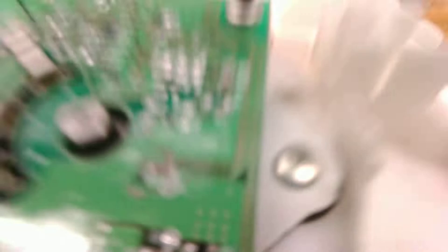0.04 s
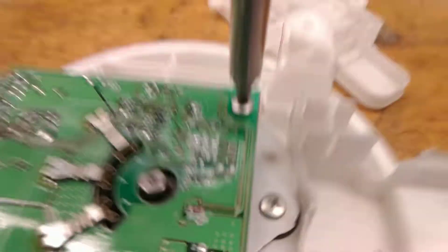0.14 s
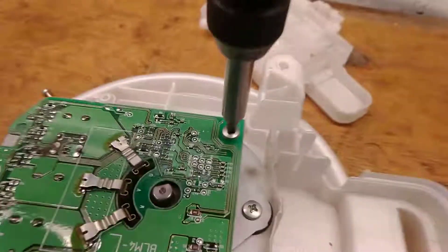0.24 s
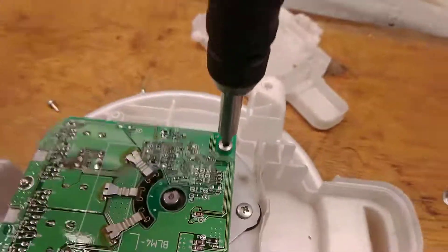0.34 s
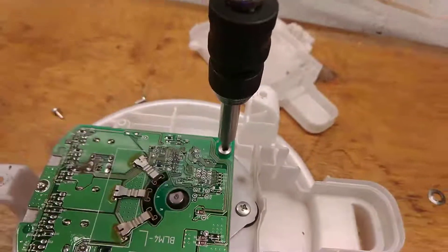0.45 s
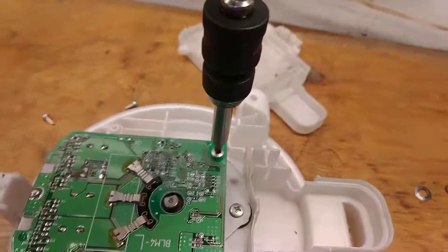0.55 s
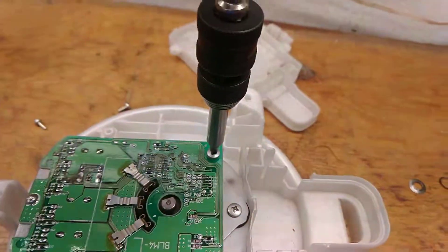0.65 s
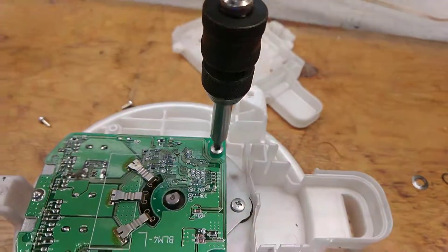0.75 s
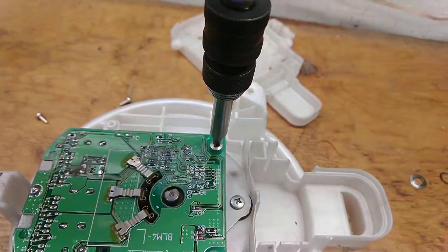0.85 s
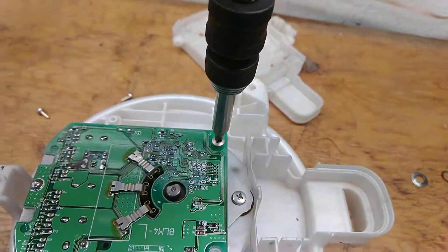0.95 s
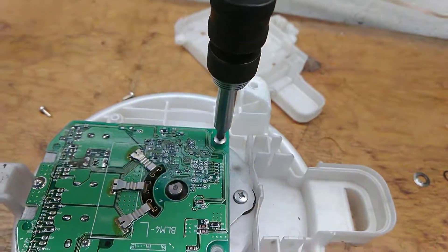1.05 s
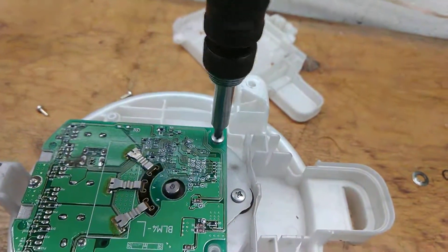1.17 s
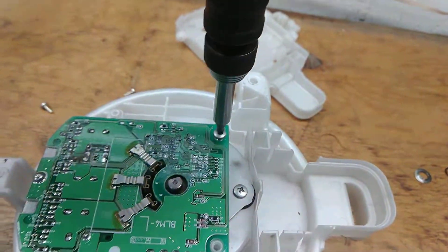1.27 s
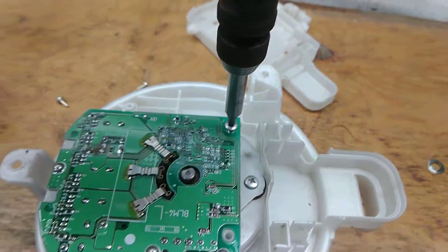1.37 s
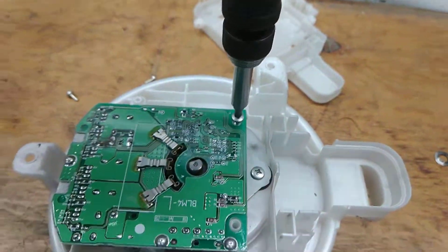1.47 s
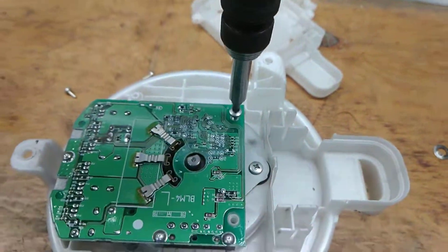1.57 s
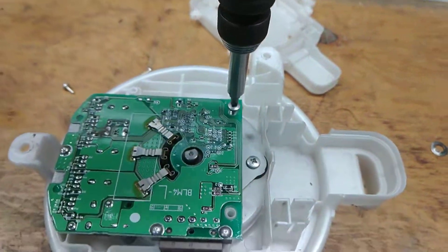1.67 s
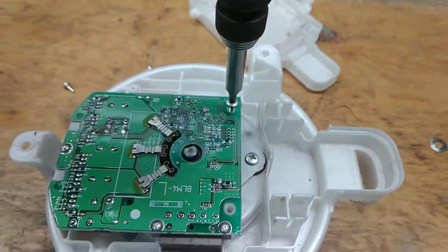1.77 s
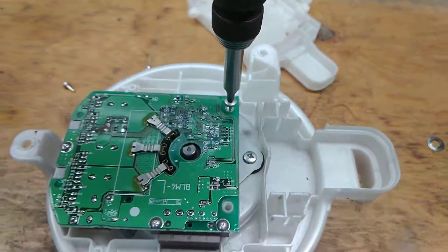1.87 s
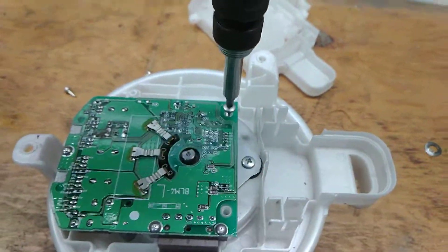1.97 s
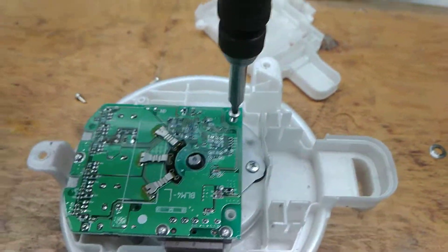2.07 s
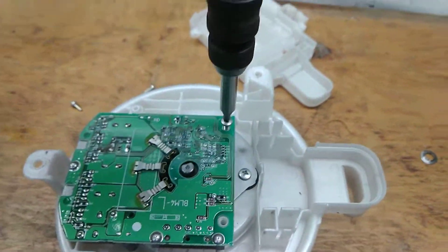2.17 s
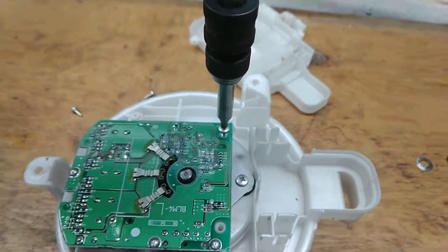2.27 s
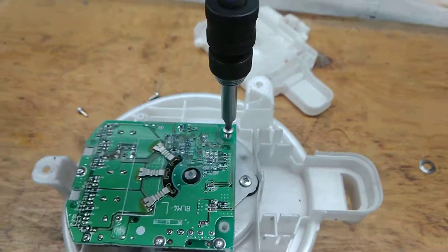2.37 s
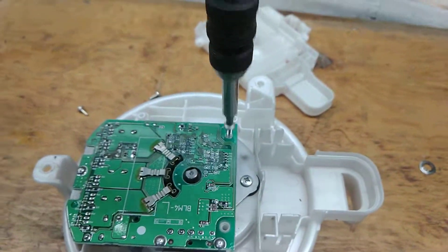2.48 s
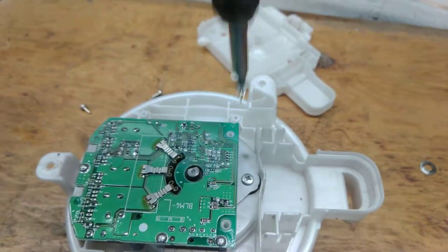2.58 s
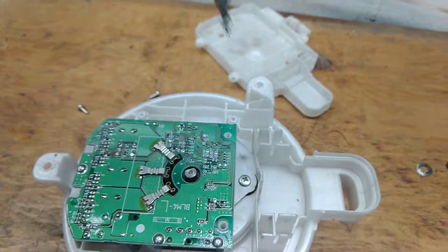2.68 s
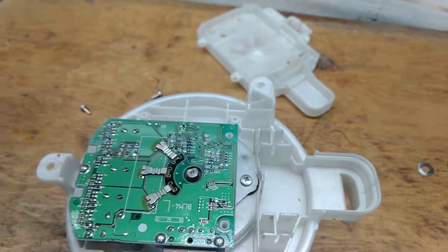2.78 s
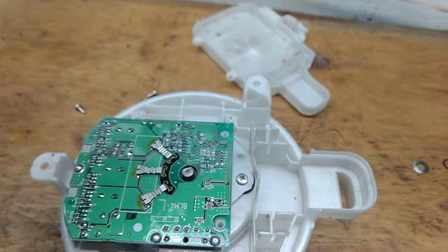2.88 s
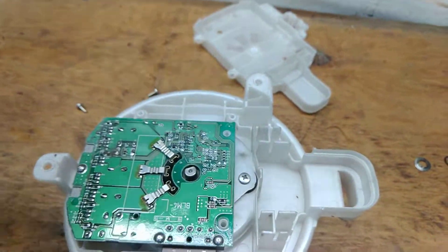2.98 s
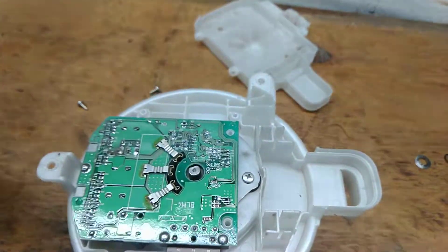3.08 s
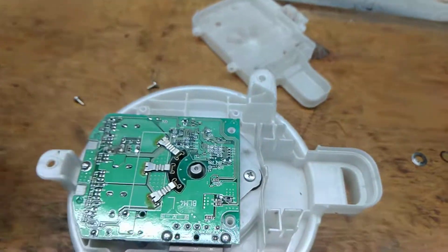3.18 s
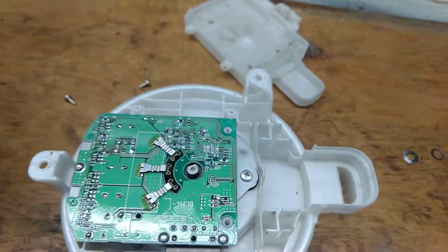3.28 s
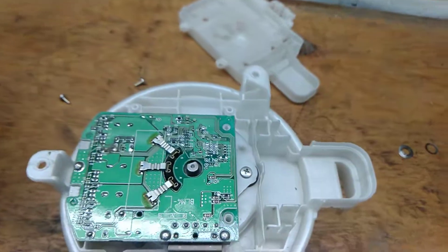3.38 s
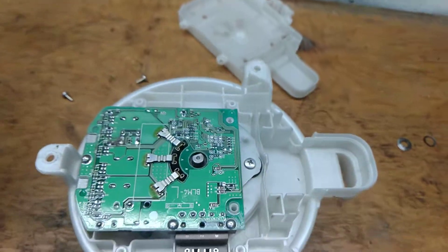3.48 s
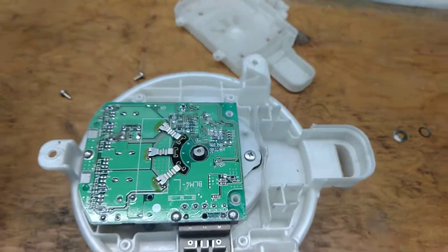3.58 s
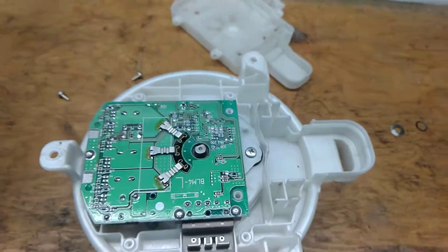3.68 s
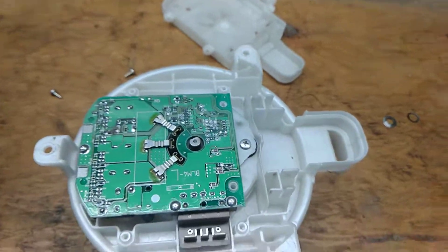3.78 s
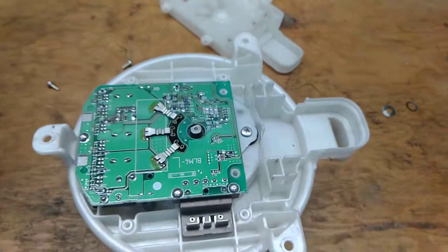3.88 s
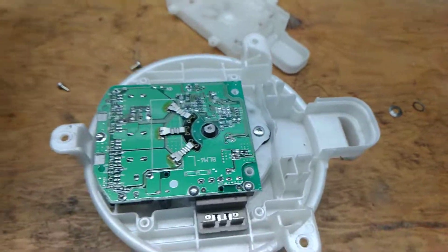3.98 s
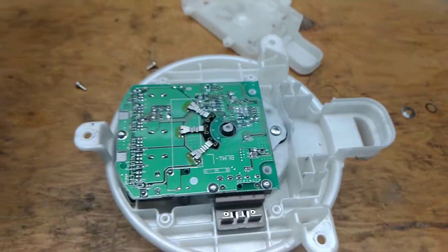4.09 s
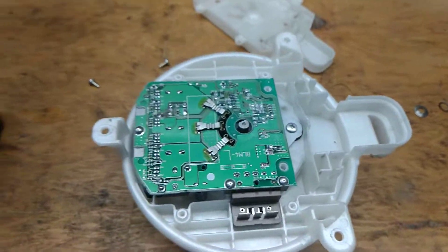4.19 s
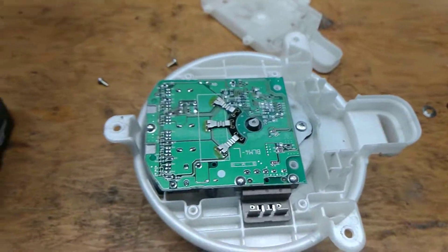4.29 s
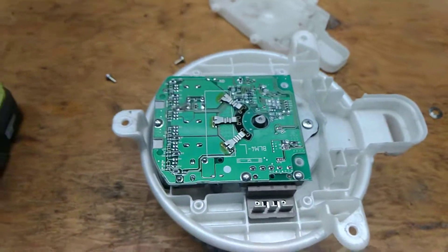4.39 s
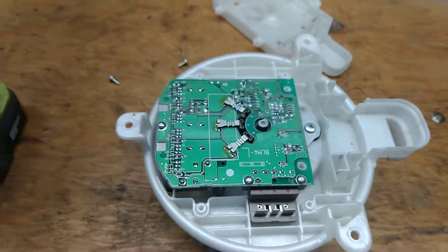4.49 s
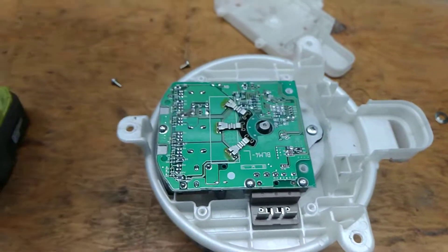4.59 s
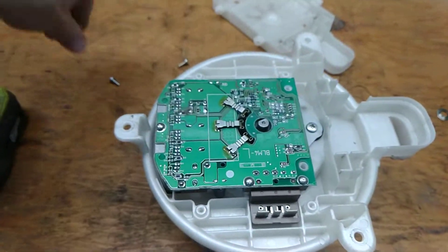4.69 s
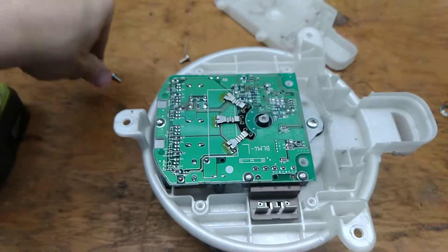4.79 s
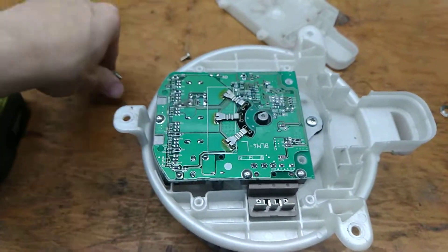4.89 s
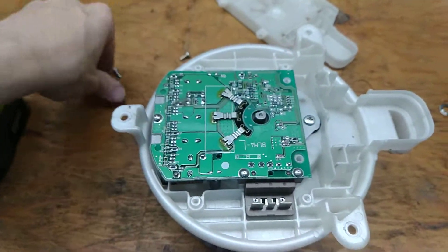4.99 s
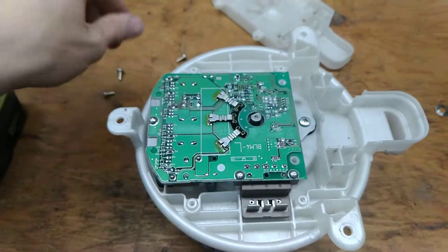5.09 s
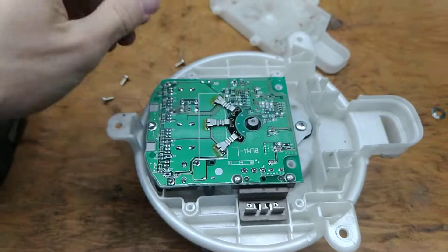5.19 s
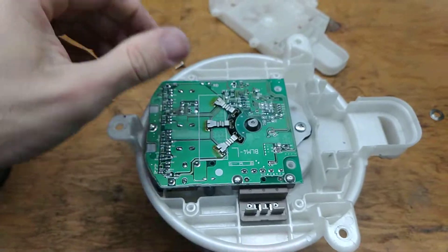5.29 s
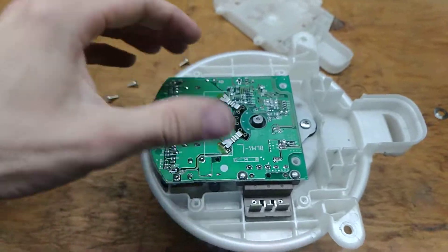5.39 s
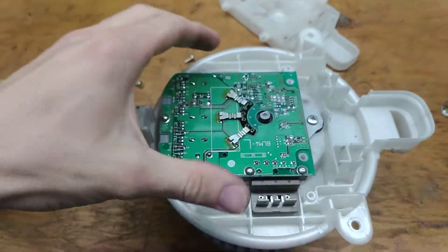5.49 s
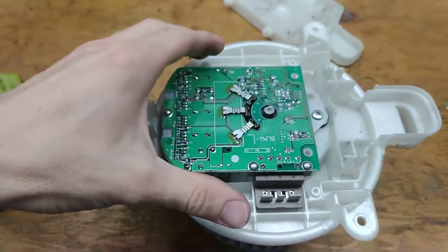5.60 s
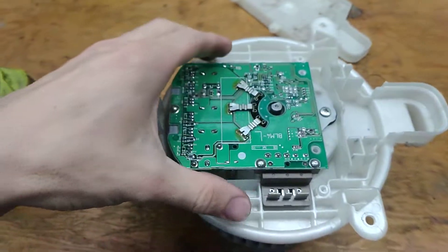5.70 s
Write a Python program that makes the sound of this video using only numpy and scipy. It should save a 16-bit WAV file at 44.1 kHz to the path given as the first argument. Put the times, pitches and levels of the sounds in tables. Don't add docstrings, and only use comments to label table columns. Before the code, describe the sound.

A small workshop is heard close up in stereo on a handheld device, with low mains hum, soft ventilation and only a short room reflection. Up to 0.9 s there are just faint ticks and light rubs. A thin whistle starts at 0.87 s, and from about 1.0 s a cordless driver whines and grinds with brush hiss, rising slightly. At 1.92 s the screw comes free: the pitch jumps and climbs, with hollow bumps at 1.93, 2.08 and 2.23 s, a softer one at 2.38 s, and rattling. The motor stops near 2.6 s with a tiny clink. After faint rustling, the plastic housing drops with a loud crack at 3.22 s. The tool knocks the wooden bench at 3.5 s, lands heavily at 3.56 s and rocks to rest. A hand rubs, then thuds dully at 4.36 s. Screws scrape at 4.8 s and clink brightly around 4.96-5.1 s, leaving hum.

```python
import sys
import numpy as np
from scipy import signal
from scipy.fft import rfft, irfft, next_fast_len
from scipy.io import wavfile
from scipy.ndimage import uniform_filter1d, map_coordinates

SR = 44100
rng = np.random.default_rng(int(sys.argv[2]) if len(sys.argv) > 2 else 0)


def generate_wav(signal):
    frames = np.transpose(np.atleast_2d(signal))
    scaled = np.clip(frames, -1, 1) * 32767
    pcm = np.round(scaled).astype(np.int16)
    wavfile.write(sys.argv[1], SR, pcm)


def voltage_ratio(decibels):
    exponent = np.asarray(decibels, float) / 20
    return 10 ** exponent


N = 253134
T = np.arange(N) / SR


def noise():
    return rng.standard_normal(N)


def unit(x):
    return x / np.sqrt(np.mean(x ** 2))


def bins(size):
    return np.maximum(np.fft.rfftfreq(size, 1 / SR), 1)


def gain_at(hz, points):
    f, db = np.transpose(points)
    return voltage_ratio(np.interp(np.log(hz), np.log(f), db))


def colour(x, spectrum, lo_hz=20, hi_hz=20000):
    size = next_fast_len(len(x))
    hz = bins(size)
    edges = 1 / (1 + (lo_hz / hz) ** 4) / (1 + (hz / hi_hz) ** 4)
    return unit(irfft(rfft(x, size) * gain_at(hz, spectrum) * edges, size)[:len(x)])


def steep(x, peaks):
    out = 0
    for hz, width, db in peaks:
        b, a = signal.iirpeak(hz, hz / (width * 1.2), SR)
        out = out + voltage_ratio(db) * signal.lfilter(b, a, signal.lfilter(b, a, x))
    return out


def walk(rate):
    k = int(SR / rate)
    held = np.repeat(rng.standard_normal(N // k + 1), k)
    return 0.909 * uniform_filter1d(uniform_filter1d(held, k), k)[:N]


def swell(s, length_s, edge_s):
    nearest_end = np.minimum(T - s + edge_s, s + length_s + 2 * edge_s - T)
    return np.sin(np.pi / 2 * np.clip(nearest_end / edge_s / 2, 0, 1)) ** 2


def rubs(events):
    return sum(voltage_ratio(db) * swell(s, length_s, 0.0071) for s, length_s, db in events)


def add(out, s, sound):
    i = int(s * SR)
    out[i:i + len(sound)] += sound[:len(out) - i]


def hits(events, modes, spectrum, push_s, crack_s, tail_s, tail_db, top_hz):
    out, t = np.zeros(N), T[:SR // 5]
    hz, db, t60 = np.transpose(modes)[:, :, None]
    t60 = np.minimum(t60, np.minimum(.14, .012 + 40 / hz))
    for s, peak_db, crack_db, length, bright_db in events:
        level_chance, pitch_chance = rng.standard_normal((2, len(hz), 1))
        fade = np.exp(-np.log(1000) * t / (t60 * length)) * (1 - np.exp(-t / push_s))
        level = voltage_ratio(db + bright_db * np.log2(hz / 500) + 1.5 * level_chance)
        ring = (level * fade * np.sin(2 * np.pi * hz * (1 + pitch_chance / 100) * t)).sum(axis=0)
        white = rng.standard_normal(len(t))
        crack_fade = np.exp(-t / crack_s) + voltage_ratio(-45.5) * np.exp(-t / tail_s)
        crack = colour(white, spectrum, lo_hz=1170, hi_hz=top_hz) * (1 - np.exp(-t / 0.00019)) * crack_fade / 3
        tail_fade = np.exp(-t / (tail_s * length)) * (1 - np.exp(-t / 0.0017))
        tail = colour(white, spectrum, lo_hz=220.0) * voltage_ratio(tail_db) * tail_fade
        add(out, s, voltage_ratio(peak_db) * (ring / np.abs(ring).max() + voltage_ratio(crack_db) * crack + tail))
    return out


TOUCH_S, BITE_S, FREE_S, RELEASE_S = 0.87, 0.97, 1.92, 2.61
# (t/s, armature turns f/Hz, effort level/dB)
MOTOR_RUN = [(.987, 157.6, -50.5), (1.01, 163.3, -46), (1.1, 168.2, -44), (1.27, 176.3, -45.5),
             (1.4, 178.5, -45.5), (1.6, 179.9, -46), (1.89, 187.2, -45.5), (1.92, 271, -43),
             (2.1, 279.6, -42), (2.27, 287, -44.5), (2.38, 299, -43.5), (2.5, 308.3, -44.5),
             (2.6, 304, -52), (2.68, 304, -76.5)]
# (multiple of the turn rate, level/dB)
WHINE_HARMONICS = [(3, -1), (4, 0), (5, 0), (6, 0), (7, -1), (8, -1), (9, -4)]
# (f/Hz, width/Hz, level/dB)
SHELL_PEAKS = [(700, 125, -1.5), (841, 60, 5.5), (1054, 148, 0.5), (1263, 67, -1), (1454, 180, -1.5)]
# (f/Hz, level/dB per Hz)
GRIND_SPECTRUM = [(70, -19.5), (135, 6.5), (200, -9.5), (300, -9), (550, -12.5), (900, -7.5), (1500, -14),
                  (2350, -13), (3300, -15), (4700, -17), (6500, -15.5), (8500, -21.5), (11000, -26),
                  (11500, -41), (12100, -48.5), (13300, -31), (14100, -33), (14600, -57.5)]
# (f/Hz, width/Hz, level/dB)
CHUCK_PEAKS = [(3720, 380, 0), (14900, 900, -18)]


def driver():
    s, run_hz, run_db = np.transpose(MOTOR_RUN)
    turns_hz, effort_db = np.interp(T, s, run_hz), np.interp(T, s, run_db)
    turn = 2 * np.pi * np.cumsum(turns_hz * (1 + 0.00905 * walk(30.1))) / SR
    effort = voltage_ratio(effort_db) * swell(s[0], s[-1] - s[0], 0.019)
    hiss_gain = effort * voltage_ratio(3.5 * np.log2(uniform_filter1d(turns_hz, size=SR // 8) / 200))

    throb = 1 + .5 * np.cos(turn / 12)
    whine = 0
    for k, db in WHINE_HARMONICS:
        level = voltage_ratio(db + 3 * walk(9) + 3.5 * walk(40))
        whine = whine + level * throb * np.sin(k * turn + 7 * rng.random())
    whine = unit(steep(whine, SHELL_PEAKS))

    once_a_turn = 1 + 0.2 * np.cos(turn) + 0.11 * np.cos(2 * turn)
    bite = voltage_ratio(1.1 * walk(600) + 0.5 * walk(30.27)) * once_a_turn
    teeth = noise() * bite
    grind = colour(teeth, GRIND_SPECTRUM, lo_hz=413, hi_hz=2300)
    apart = np.array([colour(noise() * bite, GRIND_SPECTRUM, lo_hz=3200) for _ in range(2)])
    hiss = colour(teeth, GRIND_SPECTRUM, lo_hz=2300) + voltage_ratio(-5) * apart
    hiss = hiss * voltage_ratio(2.4 * walk(53.5))
    shake = colour(noise(), GRIND_SPECTRUM, hi_hz=367) * voltage_ratio(2 * walk(29.36))
    rattle = voltage_ratio(-6) * unit(steep(teeth, CHUCK_PEAKS)) * swell(FREE_S + .08, 1, .06)
    body = effort * (rattle + voltage_ratio(2.5) * whine + voltage_ratio(5.5) * grind + voltage_ratio(-4 + 9.5) * shake)
    return body, hiss_gain * voltage_ratio(4.5) * hiss


def controller():
    idle_hz, loaded_hz, sag_s = 7250, 6900, .02
    idle_db, loaded_db, octave_loaded_db, octave_free_db = -68, -62, -63, -72
    load = 1 - np.exp(-np.maximum(T - BITE_S, 0) / sag_s)
    rate_hz = (idle_hz + (loaded_hz - idle_hz) * load) * (1 + 0.0073 * walk(150))
    phase = 2 * np.pi * np.cumsum(rate_hz) / SR
    db = idle_db + (loaded_db - idle_db) * load
    octave_db = np.where(T < FREE_S, octave_loaded_db - 8 * (1 - load), octave_free_db)
    whistle = voltage_ratio(db + 2.3 * walk(37)) * np.sin(phase)
    octave = voltage_ratio(octave_db + 2.3 * walk(30)) * np.sin(2 * phase)
    return (whistle + octave) * swell(TOUCH_S, RELEASE_S - TOUCH_S, .005)


# (t/s, peak level/dB, crack over ring level/dB, ring length factor)
LIFT_EVENTS = [
    (1.931, -9, 0, 1.11),
    (2.081, -8, 2, 1.07),
    (2.227, -7.5, 1.5, 1.03),
    (2.38, -17, -17, 0.79),
    (2.455, -41, -2, 0.72),
]
# (f/Hz, level/dB, t60/s)
LIFT_MODES = [(60.1, -34, 0.3), (142, -1.5, 0.104), (251.2, 4, 0.073), (395, -8.5, 0.053),
              (481, -12.5, 0.1), (566, -11.5, 0.1), (725, -14, 0.097), (846, -21, .07), (1085, -9, 0.1),
              (1640, -12, 0.024)]
# (f/Hz, level/dB per Hz)
WOOD_SPECTRUM = [(40, 0), (80, -1.5), (160, 11.5), (300, 0), (550, -5), (900, -13), (1500, -23),
                 (2300, -23.5), (3500, -31.5), (5500, -35.5), (8000, -36), (10500, -44.5), (13500, -54),
                 (16000, -56)]


def screw_lifts():
    bumps = []
    for s, db, crack_db, length in LIFT_EVENTS:
        bumps.append((s, db, crack_db, length, 0))
        bumps.append((s + .0082, db - 2, crack_db - 5, 0.23 * length, -1.5))
    return hits(bumps, LIFT_MODES, WOOD_SPECTRUM, push_s=0.0018, crack_s=0.0019,
                tail_s=0.017, tail_db=-15.5, top_hz=2500)


# (t/s, peak level/dB, crack over ring level/dB, ring length factor, brightness/dB per octave)
FALL_EVENTS = [
    (3.2245, -2.5, 3.5, 0.85, 0.55),
    (3.247, -31.5, 6, .7, 0.99),
    (3.277, -33.5, 8, 0.53, 0.32),
]
# (f/Hz, level/dB, t60/s)
FALL_RING = [(159.5, -3, 0.19), (287, 4, 0.077), (333, -1.5, 0.07), (511, -9, 0.09), (577, -10, 0.05),
             (689, -13, .1), (756, 3.5, 0.032), (990, -16, 0.075), (1330, -16, .05), (1640, -23.5, 0.06),
             (1720, -23.5, 0.05), (1500, -14, .04), (3650, -19.5, 0.025), (3700, -28, .07)]


def housing_fall():
    return hits(FALL_EVENTS, FALL_RING, WOOD_SPECTRUM, push_s=0.002, crack_s=0.0017,
                tail_s=0.031, tail_db=-15, top_hz=12400)


# (t/s, peak level/dB, crack over ring level/dB, ring length factor, brightness/dB per octave)
KNOCK_EVENTS = [
    (3.5005, -8, 5, 0.76, 0.86),
    (3.504, -8.5, -13.5, 0.66, 0.91),
]
# (f/Hz, level/dB, t60/s)
KNOCK_MODES = [(159, -3.5, 0.16), (294, -1, 0.08), (367, -2.5, 0.06), (473, -7.5, 0.07), (524, 1.5, 0.0486),
               (736, -7, 0.066), (784, -3.5, 0.06), (849, -9, 0.037), (965, -5.5, 0.07), (1104, -6, 0.085),
               (1290, -9, 0.05), (1552, -21, .03), (3050, -12, .026), (3460, -19, .04)]


def tool_knocks():
    return hits(KNOCK_EVENTS, KNOCK_MODES, WOOD_SPECTRUM, push_s=0.0014, crack_s=0.0021,
                tail_s=0.0204, tail_db=-5.5, top_hz=11120)


# (t/s, peak level/dB, crack over ring level/dB, ring length factor, brightness/dB per octave)
ROCK_EVENTS = [
    (3.557, -8.5, -7, 0.94, 4),
    (3.561, -10, -3, 0.84, 0.5),
    (3.5662, -5.5, -18, .75, -3),
    (3.59, -26.5, -13, 0.98, -7.5),
    (3.6, -21, -1, 1.0, -10.5),
    (3.629, -34, 3.5, 0.55, 0),
    (3.663, -52, 11, 0.92, 10),
    (3.678, -35.5, -18, 0.34, -7.5),
]
# (f/Hz, level/dB, t60/s)
ROCK_RING = [(60.4, -18.5, .3), (107, -11, .2), (154, 3, 0.14), (218, -6, 0.18), (300, -6, 0.072),
             (420, -11, .05), (474, -4.5, 0.11), (582, -1.5, 0.063), (647, -12.5, 0.048),
             (725.4, -5.5, .069), (991, -10.5, .065), (1073, -14.5, .07), (1273, -15.5, .05),
             (1877, -24.5, 0.0092)]


def tool_rocks():
    return hits(ROCK_EVENTS, ROCK_RING, WOOD_SPECTRUM, push_s=0.0015, crack_s=0.0026,
                tail_s=0.031, tail_db=-17, top_hz=11120)


# (t/s, peak level/dB, crack over ring level/dB, ring length factor, brightness/dB per octave)
THUD_EVENTS = [
    (4.325, -30, -14, 0.82, -10),
    (4.3638, -7, -24, 0.42, -7.5),
    (4.37, -14.5, -35, 1.15, -4),
]
# (f/Hz, level/dB, t60/s)
THUD_RING = [(155.3, -3.5, 0.088), (224, 0, 0.082), (278.3, 5.5, 0.068), (355, 1.5, 0.04), (437, -8, 0.073),
             (690, 0, 0.035)]


def hand_thuds():
    return hits(THUD_EVENTS, THUD_RING, WOOD_SPECTRUM, push_s=0.0022, crack_s=0.0037,
                tail_s=0.023, tail_db=-19.0, top_hz=9000)


# (t/s, peak level/dB, crack over ring level/dB, ring length factor, brightness/dB per octave)
CLINK_EVENTS = [(2.612, -16, -5, 0.53, 17.5), (2.664, -61, -7, 0.56, 16), (4.959, -18.5, 2, 1.67, -0.5),
                (4.966, -10, 3.5, 1.6, 6), (5.02, -16.5, 6.5, 1.4, 3.5), (5.039, -21.5, 2, 1.3, 8.5),
                (5.049, -26, 1, 2.4, 1.5), (5.066, -31, -9, 1.3, 0.5), (5.075, -30.5, -5, 1.5, 3.5),
                (5.085, -39, -9, 1.3, -9), (5.1, -49, -9, 2, -8)]
# (f/Hz, level/dB, t60/s)
CLINK_MODES = [(287, -11, 0.03), (706, -1.5, 0.019), (1036, -0.5, 0.071), (1095, 3.5, 0.06),
               (1302, 3, 0.18), (1630, -11.5, 0.025), (3000, -14, .04), (3546, 2.5, 0.037),
               (3690, -3.5, 0.077), (3890, -9.5, 0.028), (5640, -6.5, 0.038), (6500, 2.5, 0.0042)]
# (f/Hz, level/dB per Hz)
METAL_SPECTRUM = [(40, -38.5), (80, 0), (160, 2), (300, -2.5), (550, 0), (900, -7), (1500, -9),
                  (2300, -6.5), (3500, -8), (5500, -12.5), (8000, -21), (10500, -42.5), (13500, -41.5),
                  (16000, -42.5)]


def screw_clinks():
    return hits(CLINK_EVENTS, CLINK_MODES, METAL_SPECTRUM, push_s=0.00021, crack_s=0.0019,
                tail_s=0.01, tail_db=-13.0, top_hz=7000)


# (t/s, peak level/dB, crack over ring level/dB, ring length factor, brightness/dB per octave)
PING_EVENTS = [
    (4.869, -36.5, -8.5, 1.7, 0.52),
    (4.927, -58.5, -12.5, 1.2, 3),
]
# (f/Hz, level/dB, t60/s)
PING_RING = [(1960, -6, .04), (2970, 0.5, .04), (3660, -14, .035), (4300, -6.5, .03), (8000, -20, .025)]


def screw_pings():
    return hits(PING_EVENTS, PING_RING, METAL_SPECTRUM, push_s=0.0003, crack_s=0.0012,
                tail_s=0.0098, tail_db=-14, top_hz=6000)


# (t/s, length/s, level/dB)
SLIDE_STROKES = [
    (4.797, 0.028, -50),
    (4.826, 0.021, -53),
    (4.845, 0.043, -63),
    (4.92, 0.022, -70),
    (4.99, 0.031, -77.5),
    (5.04, 0.015, -56.5),
    (5.08, 0.029, -80),
]
# (f/Hz, width/Hz, level/dB)
SCRAPE_PEAKS = [(2120, 150, 3.5), (3164, 170, 12), (3700, 120, 4), (4100, 150, 6.5), (4500, 200, 13),
                (6050, 250, 0), (6290, 150, 2), (7130, 250, 4), (7950, 180, -0.5), (8500, 250, 1.5),
                (10000, 600, -12.5), (1170, 520, -1.5)]
# (t/s, length/s, level/dB)
HAND_STROKES = [
    (.525, 0.016, -59),
    (.67, 0.044, -68),
    (.75, 0.39, -69),
    (2.875, 0.031, -63),
    (4.11, 0.21, -60),
    (4.33, 0.028, -55),
    (4.785, 0.12, -55),
]
# (t/s, length/s, level/dB)
SLEEVE_STROKES = [
    (2.91, 0.109, -69),
    (3.03, .12, -76),
]


def slides():
    slip = noise() * voltage_ratio(2.4 * walk(150))
    pace = 1 - .06 * np.clip((T - 4.805) / .08, 0, 1)
    scrape = map_coordinates(unit(steep(slip, SCRAPE_PEAKS)), [np.cumsum(pace)], mode="mirror")
    rumble = colour(noise() * voltage_ratio(2.5 * walk(60)), WOOD_SPECTRUM, hi_hz=609)
    rustle = colour(slip, METAL_SPECTRUM, lo_hz=1710, hi_hz=5000)
    return (rustle * rubs(SLEEVE_STROKES) + voltage_ratio(2.0) * scrape * rubs(SLIDE_STROKES)
            + voltage_ratio(5.5) * rumble * rubs(HAND_STROKES))


# (t/s, peak level/dB, centre f/Hz)
TICK_EVENTS = [(.49, -62, 3000), (.508, -56, 5000), (0.526, -56, 2500), (0.558, -52, 1180),
               (.574, -58, 5000), (.655, -56, 6500), (.675, -62, 5000), (.732, -56, 6000), (.79, -55, 5000),
               (0.869, -60, 2970), (0.897, -53, 1750), (1.134, -41, 3700), (2.238, -26, 3473),
               (2.262, -38, 4200), (2.441, -31, 3000), (2.457, -16.5, 2790), (2.644, -54, 6000),
               (3.245, -30, 11000), (3.265, -46, 8000), (3.278, -39, 7000), (3.013, -65, 3740),
               (3.071, -56, 3900), (3.12, -49, 2300), (4.114, -52, 2000), (4.115, -63, 8000),
               (4.128, -49.5, 7000), (4.134, -61, 7000), (4.134, -48, 2510), (4.205, -49.5, 2200),
               (4.23, -59, 1700), (4.265, -57, 7000), (4.274, -50.5, 1960), (4.276, -57, 10000),
               (4.321, -33.5, 8240), (4.322, -52, 8500), (4.351, -43, 3000), (4.358, -20, 1500),
               (4.359, -22, 4360), (4.359, -25, 8500)]


def ticks():
    out, t = np.zeros(N), T[:800]
    for s, db, hz in TICK_EVENTS:
        burst = rng.standard_normal(len(t)) * np.exp(-t / .0015)
        grain = steep(burst, [(hz, hz * .8, 0)])
        add(out, s, voltage_ratio(db) * grain / np.abs(grain).max())
    return out


def room(x):
    t, t60_s, wet_db, shifts_per_s = T[:SR // 5], .2, -8, 70
    fade = np.exp(-np.log(1000) * t / t60_s) * (voltage_ratio(-32.0) + np.exp(-t / 0.0023))
    tails = rng.standard_normal((6, len(t))) * fade
    tails = signal.lfilter(*signal.butter(2, 1500, "high", fs=SR), tails)
    tails = tails / np.linalg.norm(tails, axis=1, keepdims=True)
    shift = np.array([walk(shifts_per_s) for _ in range(6)]).reshape(2, 3, N)
    shift = shift / np.linalg.norm(shift, axis=1, keepdims=True)
    wet = signal.fftconvolve(x[None], tails, axes=1)[:, :N].reshape(2, 3, N)
    return voltage_ratio(wet_db) * (shift * wet).sum(axis=1)


AIR_DB = -63


def duck():
    fall_s, rock_s = FALL_EVENTS[0][0], ROCK_EVENTS[0][0]
    since = np.maximum(T - fall_s, 0)
    dips = sum(np.exp(-((T - s - 0.24) / .06) ** 2) for s in (fall_s, rock_s))
    slow = (1 - np.exp(-since / .08)) * np.exp(-(since / 0.6) ** 2)
    return voltage_ratio(-3 * dips - 2.5 * slow)


# (f/Hz, level/dB per Hz)
AIR_SPECTRUM = [(40, -27), (80, 6.5), (160, 1.5), (300, -2), (550, 2.5), (900, -3.5), (1500, -16.5),
                (2300, -23.5), (3500, -26), (5500, -33), (8000, -32.5), (10500, -40.5), (13500, -40.5),
                (16000, -36.5)]
# (f/Hz, peak level/dB)
HUM_LINES = [(59.8, -79), (119.6, -52.5), (239.2, -82.5)]


def workshop():
    whole = 0
    for hz in 30 * 2. ** np.arange(10):
        band = colour(noise(), [(1, 0), (2, 0)], hz, 2 * hz)
        whole = whole + band * np.sqrt(hz) * voltage_ratio(1.1 * walk(7))
    hum = 0
    for hz, db in HUM_LINES:
        hum = hum + voltage_ratio(db + 0.5 * walk(0.87) + 1.0 * walk(12)) * np.sin(2 * np.pi * hz * T)
    diffuse = np.array([colour(noise(), AIR_SPECTRUM, lo_hz=304) for _ in range(2)])
    return duck() * (voltage_ratio(AIR_DB) * colour(whole, AIR_SPECTRUM) + hum + voltage_ratio(AIR_DB - 3.5) * diffuse)


SIDE_HZ = [150, 300, 600, 1200]


def place(x, side_db):
    size = next_fast_len(N)
    side = gain_at(bins(size), np.transpose([SIDE_HZ, [*side_db, 0]]))
    return np.array([x, irfft(rfft(x, size) * side, size)[:N]])


def scene():
    body, hiss = driver()
    near = place(body + screw_lifts(), (2, 4, 0.5))
    near = near + place(housing_fall(), (2.5, -4, -0.77))
    near = near + place(tool_knocks(), (0.85, -5, .6))
    near = near + place(tool_rocks(), (2.5, .6, 4))
    near = near + place(screw_pings() + screw_clinks() + slides(), (-2.5, -1.5, 1.8))
    near = near + place(hand_thuds(), (2.2, -5, .2))
    near = near + controller() + ticks()
    return near + hiss + room(near[0]) + workshop()


def low_pass(x):
    return signal.sosfilt(signal.butter(12, 16630, fs=SR, output="sos"), x)


# (f/Hz, level/dB)
PORT_RESPONSE = [(40, -15.5), (150, -11), (300, -5), (700, -6), (1800, -1.5), (2400, 1.64), (3100, -1),
                 (4800, -4.5), (6500, -10.5), (9600, -5), (15000, -4.5)]


def record(dry):
    steer_s, copy_treble, copy_hz = 1 / 2410, .62, 3600
    bass_turn, bass_turn_hz = 0.81, 1060
    far_port, far_port_hz, treble_db = 2.47, 2000, 4
    own_bass_hz = 900
    size = next_fast_len(N)
    hz = bins(size)
    left, other = rfft(dry, size)
    copy = copy_treble + (1 - copy_treble) / (1 + (hz / copy_hz) ** 4)
    turn = bass_turn / (1 + (hz / bass_turn_hz) ** 4)
    late = -copy * np.exp(-2j * np.pi * hz * steer_s - 1j * turn)
    share = far_port / (1 + (far_port_hz / hz) ** 2)
    leak = (.04 + 1.0 * (1 - copy)) * np.exp(-2j * np.pi * hz * .004)
    far = share * (other - left)
    even = voltage_ratio(treble_db * share / far_port) / np.sqrt(1 + share ** 2 / 2)
    own = left + (other - left) / (1 + (hz / own_bass_hz) ** 4)
    right_side = gain_at(hz, PORT_RESPONSE) * (late * own + far * (1 - leak))
    both = irfft(even * np.array([left + late * far, right_side]), size)[:, :N]
    both = signal.sosfilt(signal.butter(6, 50, "high", fs=SR, output="sos"), both)
    both = voltage_ratio(1.5) * signal.sosfilt(signal.ellip(8, .2, 70, 15600, fs=SR, output="sos"), both)
    capsule_hiss = np.array([colour(noise(), AIR_SPECTRUM, lo_hz=1467) for _ in range(2)])
    both = both + voltage_ratio(-88.5) * rng.standard_normal(both.shape) + voltage_ratio(-75.5) * capsule_hiss
    return low_pass(1.5 * np.tanh(both / 1.52))


dry = scene()
out = record(dry)
generate_wav(out)
```